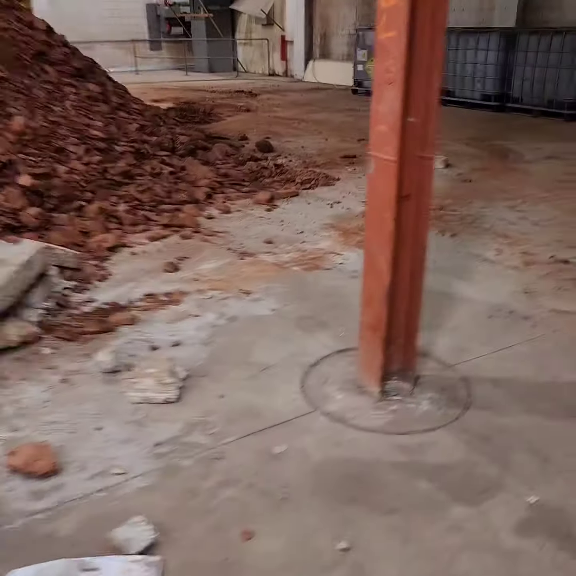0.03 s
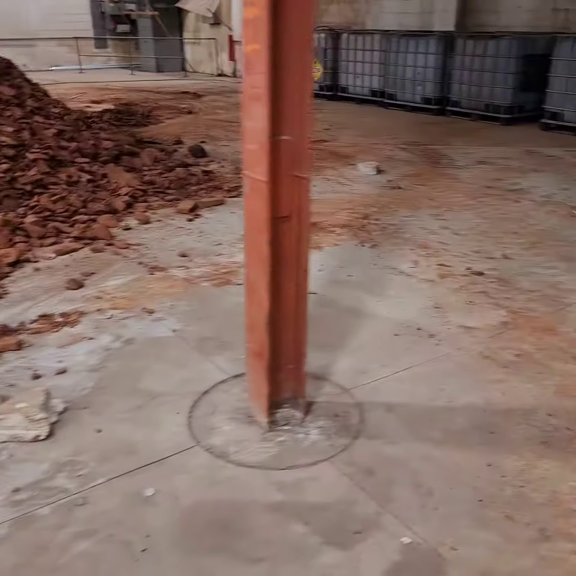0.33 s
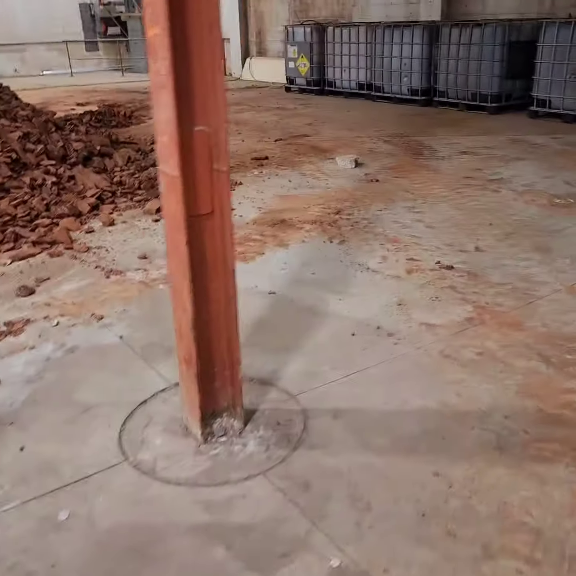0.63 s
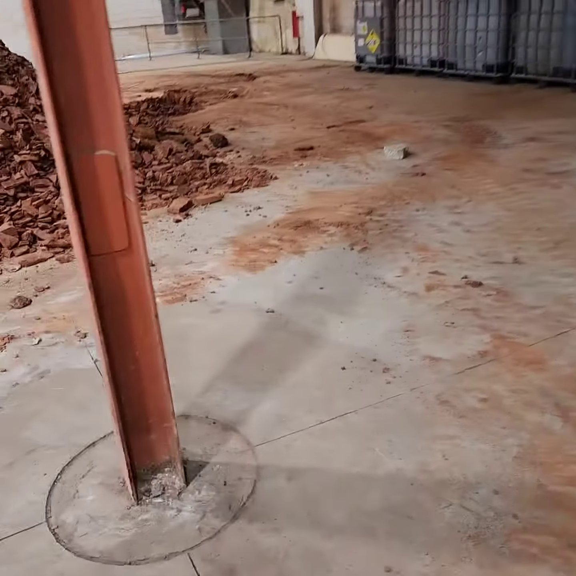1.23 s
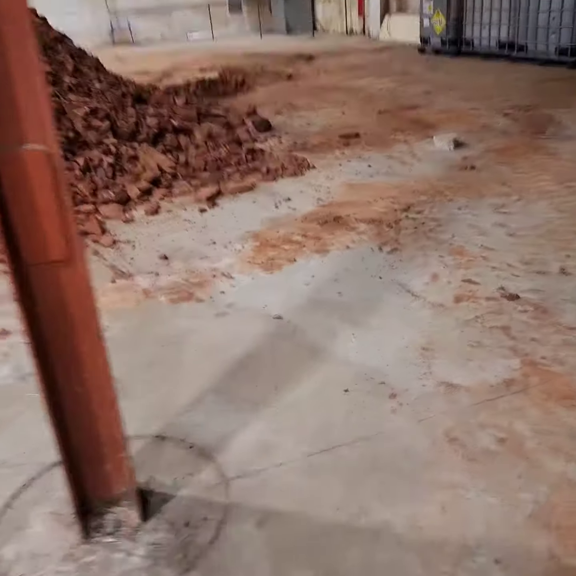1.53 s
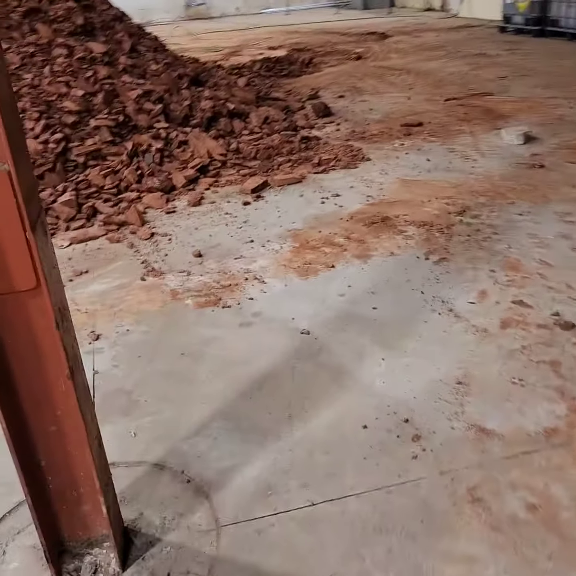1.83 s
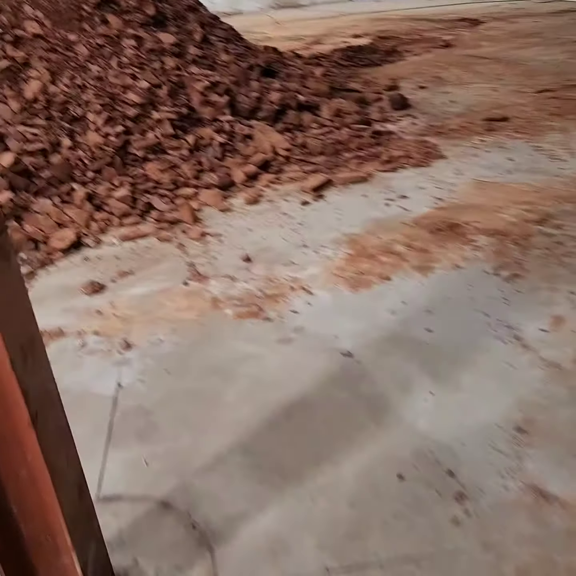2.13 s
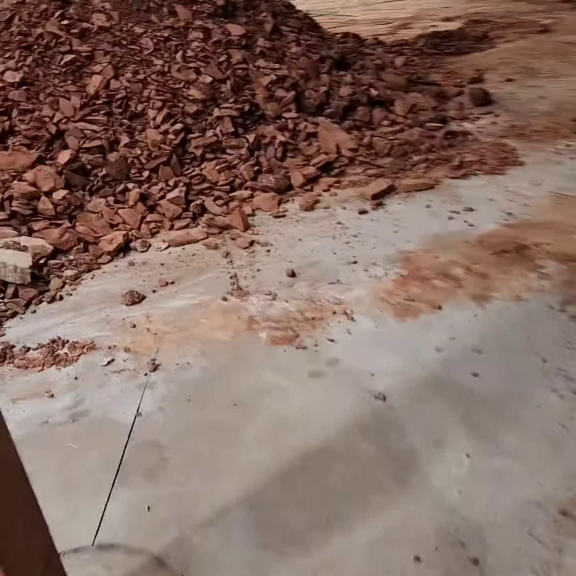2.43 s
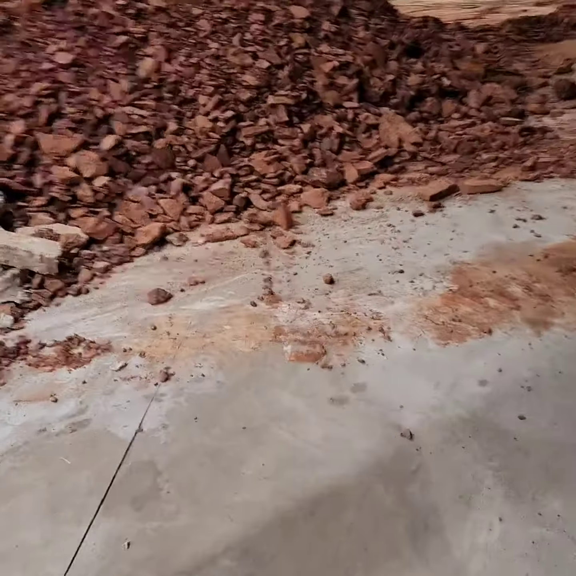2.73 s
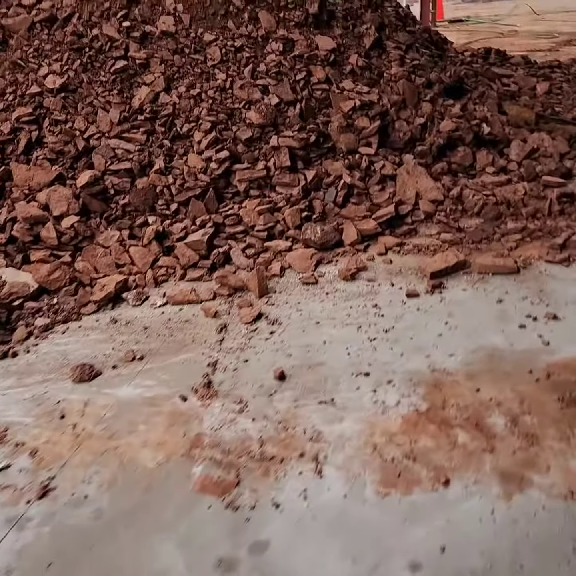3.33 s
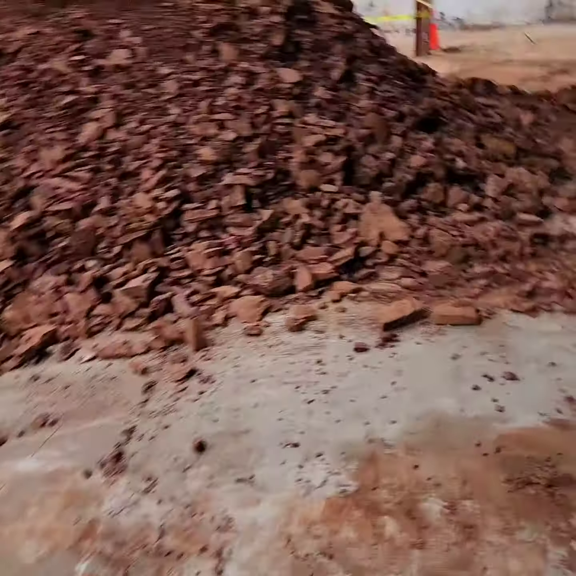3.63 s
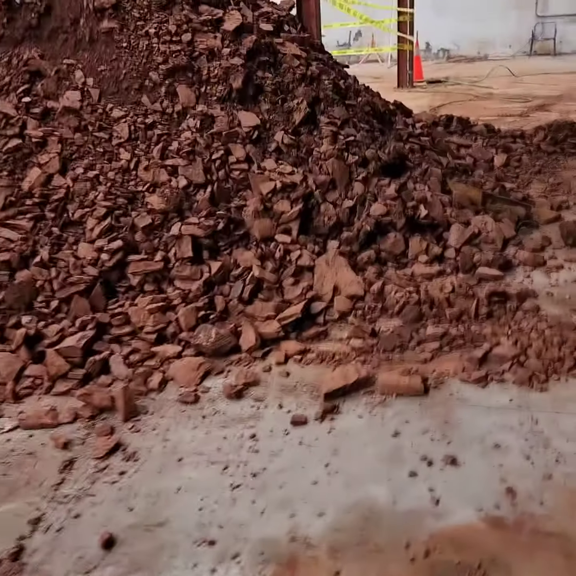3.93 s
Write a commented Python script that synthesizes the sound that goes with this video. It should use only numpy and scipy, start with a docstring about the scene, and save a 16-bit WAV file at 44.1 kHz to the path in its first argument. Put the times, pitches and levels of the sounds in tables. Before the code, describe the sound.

Low rumble and hum of distant machinery, with a few knocks and gritty footsteps.

```python
"""Slow walk in an industrial hall.

Two distant machines hum and beat over a rumble; hiss and thin whines swell midway.
Fingers knock on the hand-held phone that hears it all. One hollow scrape rings through the hall.
Soles crunch, grind and slide on gritty concrete, each sound a stream of tiny fractures."""
import sys
import numpy as np
from scipy import signal
from scipy.fft import rfft, irfft
from scipy.io import wavfile
from scipy.ndimage import uniform_filter1d

SR = 44100
rng = np.random.default_rng(int(sys.argv[2]) if len(sys.argv) > 2 else 0)


def transcribe(signal):
    """Save signal, clipped to [-1, 1], as a 16-bit WAV file at the path in sys.argv[1]."""
    frames = np.atleast_2d(signal).T
    limited = np.clip(frames, -1, 1)
    pcm = np.round(limited * 32767).astype(np.int16)
    wavfile.write(sys.argv[1], SR, pcm)


N = 176400

# Noise spectra. Each row: frequency in Hz, relative density in dB.
RUMBLE_SHAPE = [(20, -31), (35, -9), (52, -1), (80, 1.5), (110, -3), (165, -3), (210, -9), (300, -13),
                (450, -20), (700, -22.5), (1100, -37.5), (2500, -50.5)]
HISS_SHAPE = [(300, -20), (700, -2.5), (1100, -1), (1600, 0.5), (2300, 2.5), (3000, -7.5), (4200, -6),
              (5300, -20.5), (7500, -19), (9500, -44), (16000, -84)]
SHRILL_SHAPE = [(1200, -13.5), (2400, -3.5), (3100, 1), (4100, -2.5), (5200, -10.5), (8000, -38.5),
                (16000, -23)]
SIZZLE_SHAPE = [(3000, 10), (5500, -13.5), (7600, 1.5), (9400, -13), (11800, 2), (13500, -6), (16000, -4)]
RATTLE_SHAPE = [(200, 1), (400, 16.5), (550, 23.5), (800, -17), (1300, -11), (2000, 15.5), (3000, -6),
                (4050, 12.5), (5200, -13), (8300, -7.5), (16000, -18)]
RASP_SHAPE = [(150, -10), (260, 6), (450, 4.5), (800, -5.5), (1200, -7), (2100, -7), (4200, -12.5),
              (7000, -18.5), (16000, -66)]
GRIT_SHAPE = [(300, -17), (1300, -10), (2100, 7.5), (2900, -7.5), (3900, 7.5), (5200, -5.5), (7800, -0.5),
              (9500, -10), (11800, -5), (16000, -14.5)]
DUST_SHAPE = [(1500, -14), (4000, 6.5), (7400, 5.5), (9500, -1.5), (12500, 1), (16000, -1)]
# Background levels along the walk. Each row: time in seconds, level in dB.
RUMBLE_BASS_DB = [(0, -39), (1.45, -39), (1.72, -35.5), (1.95, -40), (2.5, -36.5), (2.85, -42), (3.5, -40),
                  (4, -43)]
HUM_DB = [(0, -31), (.18, -29.5), (.45, -34), (.7, -35), (.9, -30), (1.17, -26), (1.38, -30), (1.8, -28),
          (2.1, -35), (2.5, -34.5), (2.85, -37.5), (3.2, -31), (3.45, -43), (3.7, -34.5), (4, -33)]
HUM_OCTAVE_DB = [(0, -53), (.35, -45.5), (.9, -56), (1.2, -49.5), (1.75, -57), (2.2, -43.5), (2.9, -49),
                 (3.4, -59), (4, -63)]
HISS_DB = [(0, -47.5), (1.2, -46.5), (1.85, -44), (2.1, -46), (2.45, -41.5), (2.75, -46), (3.2, -45.5),
           (3.6, -49), (4, -46.5)]
CASING_DB = [(0, -57), (1.85, -46.5), (2.5, -54), (4, -67)]
SHRILL_RUSH_DB = [(0, -55.5), (1.2, -56.5), (1.5, -52.5), (1.85, -47), (2.55, -48), (2.8, -50.5),
                  (3.4, -50), (4, -57.5)]
SHRILL_WHINE_DB = [(0, -64), (1.15, -67), (1.83, -52.5), (2.05, -56), (2.62, -57.5), (2.84, -68)]
SIZZLE_DB = [(0, -52), (.5, -57.5), (1.15, -50.5), (1.55, -51.5), (1.9, -56), (2.4, -50), (2.75, -56),
             (3.1, -60), (3.72, -55.5), (4, -64)]
# Two beating machine hums. Each row: frequency in Hz, level in dB re HUM_DB.
HUM_TONES = [(117.15, -0.5), (127.0, -6.5)]
# Lesser motor tones. Each row: frequency in Hz, level in dB.
DRONE_TONES = [(93.9, -45.5), (61, -49.5), (58.54, -50.5), (177, -55), (349, -57), (406.4, -60.5),
               (462, -59), (872, -64)]
# Machine whines. Each row: frequency in Hz, level in dB re the hiss.
WHINE_TONES = [(1403, -18), (1540, -17), (1631, -17.5), (2013, -19)]
# Machine casings, hollow object, stones. Each row: frequency in Hz, width in Hz, relative level in dB.
CASING_MODES = [(1536, 170, 0.5), (2356, 52, 1)]
HOLLOW_MODES = [(251, 56, 3), (333, 13, 1.5), (396.4, 17, -2), (591, 30, 0.5), (670, 22, -11),
                (765, 11, -5), (823, 24, -2.5)]
STONE_MODES = [(2050, 520, 0), (2420, 620, -1)]
# Phone case. Each row: frequency in Hz, T60 in seconds, relative gain in dB.
PHONE_MODES = [(203, 0.018, -6), (587, 0.0068, -2.5), (1180, 0.00091, 9.5), (2220, 0.0044, -4)]
# Finger knocks. Each row: start in seconds, peak in dB, brightness in Hz, rattle in dB re the peak.
FINGER_KNOCKS = [(1.3095, -15.5, 2000, -28), (2.4458, -18, 2500, -7), (2.5562, -8, 1200, -29),
                 (3.858, -20, 450, -21)]
# Steps. Each row: start in seconds, crunch in dB, heel in dB re crunch, decay in seconds, chip ring in Hz.
FOOTFALLS = [(.603, -36.5, 4.5, .055, 3690), (1.344, -41, 3.5, .065, 6250), (2.822, -42, -10, .06, 3730),
             (3.612, -47.5, 0, .025, 4200)]
# Stones underfoot. Each row: start in seconds, length in seconds, level in dB.
STONE_GRINDS = [(.606, 0.15, -45), (1.345, 0.085, -47.5), (2.824, 0.031, -39.5)]
# Soles on dust. Each row: start, rise, hold and release in seconds, level in dB.
SOLE_SLIDES = [(0.67, 0.085, 0.066, .25, -54), (1.34, 0.014, 0.055, 0.053, -45.5),
               (2.449, .02, 0.016, 0.061, -52), (2.8, 0.025, 0.035, 0.061, -45),
               (2.887, 0.041, 0.057, .06, -48), (3.143, 0.056, 0.37, 0.15, -54),
               (3.53, 0.11, 0.028, 0.053, -55)]
# Short ticks on dust: tiny chips, and a faint step at 2.132 s. Each row: start in seconds, level in dB.
DUST_TICKS = [(.091, -53), (.469, -52), (.636, -34.5), (2.132, -45), (2.567, -49)]
# Microphone mismatch. Each row: frequency in Hz, left minus right in dB.
MIC_BALANCE = [(100, 0.5), (700, -1), (1200, -3.5), (2100, -3.5), (4000, -7), (5500, 0.5), (7300, -1),
               (9500, -2), (12000, -7.5), (16000, 1.5)]

HALL_T60_S, HALL_TREBLE_T60_S = 2.05, 1
RUMBLE_WIDE_HZ, RUMBLE_BASS_HZ, ROAR_DB = 463, 222, -37
HUMS_IN_PHASE_S, HUM_WANDER_RAD, HUM_WAVER_DB = 1.175, .1, .6
SHRILL_HZ, SHRILL_JITTER_RAD = 2960, .6
THUD_LEFT_DB, RATTLE_DECAY_S = -12.5, .0035
SCRAPE_S, RASP_DB, HOLLOW_DB, JUDDER_DB = 2.751, -37, -38, 2.5
GRAINS_PER_S, GRIT_SPREAD_DB, DUST_SPREAD_DB, CATCH_DB = 7000, 1, 2.5, 2.3
HEEL_DELAY_S, HEEL_DECAY_S, CHIP_WIDTH_HZ, CHIP_DB, STEP_HALL_DB = .001, .0045, 450, 4, -6.5
LOWPASS_HZ = 15850


def undb(db):
    """Decibels to gain."""
    return 10 ** (np.asarray(db) / 20)


def times():
    """Sample times in seconds."""
    return np.arange(N) / SR


def unit(x):
    """Scale to rms 1."""
    return x / np.sqrt(np.mean(x ** 2) + 1e-20)


def curve(rows):
    """Join (seconds, value) rows by straight lines."""
    return np.interp(times(), *np.array(rows).T)


def drift(rate_hz):
    """Smooth random signal, spread near 1."""
    span = max(int(SR / rate_hz), 2)
    stairs = np.repeat(rng.standard_normal(2048), span)[:N]
    return 1.51 * uniform_filter1d(uniform_filter1d(stairs, span), span)


def fall(start_s, decay_s):
    """Sudden onset, exponential decay."""
    age_s = times() - start_s
    return np.clip(age_s / 0.00027, 0, 1) * np.exp(-np.maximum(age_s, 0) / decay_s)


def swell(start_s, rise_s, hold_s, release_s):
    """Trapezoid envelope."""
    return np.interp(times(), start_s + np.cumsum([0, rise_s, hold_s, release_s]), [0, 1, 1, 0])


def colour(x, shape):
    """Minimum-phase filter of (Hz, dB) shape, unit power gain."""
    hz, db = np.array(shape, float).T
    bins_hz = np.fft.rfftfreq(8192, 1 / SR)
    cepstrum = irfft(np.log(undb(np.interp(np.log(bins_hz + 1), np.log(hz), db))))
    half = len(cepstrum) // 2
    cepstrum[1:half] *= 2
    cepstrum[half + 1:] = 0
    impulse = irfft(np.exp(rfft(cepstrum)))
    return signal.fftconvolve(x, impulse[None] / np.linalg.norm(impulse), axes=-1)[:, :N]


def ring(x, hz, t60_s):
    """One decaying mode."""
    return signal.lfilter([1], [1, -np.exp((2j * np.pi * hz - np.log(1000) / t60_s) / SR)], x).imag


def resonate(x, modes):
    """Parallel (Hz, width Hz, dB) modes; keeps the level."""
    out = sum(undb(db) * unit(ring(x, hz, np.log(1000) / (np.pi * width))) for hz, width, db in modes)
    return unit(out) * x.std()


def place(three, shared, pan_db):
    """Stereo from one common and two separate signals; positive pan is left."""
    pair = np.sqrt(shared) * three[0] + np.sqrt(1 - shared) * three[1:]
    return pair * undb(np.array([[pan_db], [-pan_db]]) / 2)


def grains(spread_db):
    """Three streams of tiny fractures of uneven size."""
    size = undb(spread_db * np.minimum(rng.exponential(size=(3, N)), 5))
    return unit((rng.random((3, N)) < GRAINS_PER_S / SR) * size * rng.standard_normal((3, N)))


def air():
    """Diffuse white noise, slightly left."""
    return place(rng.standard_normal((3, N)), shared=0.037, pan_db=2.0)


def hall(x):
    """Diffuse tail; treble dies first."""
    noise, t = rng.standard_normal((2, N)), times()
    low = signal.sosfilt(signal.butter(2, 3000, fs=SR, output="sos"), noise)
    tail = low * 1000 ** (-t / HALL_T60_S) + (noise - low) * 1000 ** (-t / HALL_TREBLE_T60_S)
    tail *= np.clip(t / 0.0097, 0, 1)
    return signal.fftconvolve(x, tail / np.linalg.norm(tail[0]), axes=-1)[:, :N]


def rumble():
    """Hall noise: swelling, near-mono bass under a wider, steadier roar."""
    mid, side = colour(rng.standard_normal((2, N)), RUMBLE_SHAPE)
    side = signal.sosfilt(signal.butter(1, RUMBLE_WIDE_HZ, "high", fs=SR, output="sos"), side) * 0.67
    noise = mid + side * np.array([[1], [-1]])
    bass = signal.sosfiltfilt(signal.butter(2, RUMBLE_BASS_HZ, fs=SR, output="sos"), noise)
    return (undb(curve(RUMBLE_BASS_DB)) * bass + undb(ROAR_DB) * (noise - bass)) * undb(drift(11))


def machine_hum():
    """Two close tones beat; lesser motor tones and the first hum's octave waver with them."""
    phase_per_hz = 2 * np.pi * (times() - HUMS_IN_PHASE_S)
    hum = 0
    for hz, db in HUM_TONES:
        gain = undb(db + curve(HUM_DB) + HUM_WAVER_DB * drift(10))
        hum += gain * np.cos(hz * phase_per_hz + HUM_WANDER_RAD * drift(17))
    for hz, db in DRONE_TONES:
        hum += undb(db + 2 * drift(3.6)) * np.cos(hz * phase_per_hz + 1.37 * drift(3))
    octave_hz = 2 * HUM_TONES[0][0]
    hum += undb(curve(HUM_OCTAVE_DB)) * np.cos(octave_hz * phase_per_hz + .5 * drift(2.87))
    return np.sqrt(2) * hum


def whine(hz, scatter):
    """Three versions of a steady tone plus its scatter from the hall."""
    carrier = np.exp(2j * np.pi * hz * times())
    versions = []
    for _ in range(3):
        direct = np.exp(2j * np.pi * rng.random())
        scattered = scatter * (drift(22.3) + 1j * drift(22.09))
        versions.append(((direct + scattered) * carrier).real)
    return unit(np.array(versions))


def shrill_machine():
    """A rush and a phase-jittered whine, loudest midway."""
    phase = 2 * np.pi * SHRILL_HZ * times()
    tone = unit(np.array([np.cos(phase + SHRILL_JITTER_RAD * drift(70)) for _ in range(2)]))
    rush = colour(air(), SHRILL_SHAPE)
    return rush * undb(curve(SHRILL_RUSH_DB)) + tone * undb(curve(SHRILL_WHINE_DB))


def machine_hiss():
    """Machine treble: whines, ringing casings, the shrill machine, faint sizzle and rushing noise."""
    whines = sum(undb(db) * whine(hz, scatter=1.1) for hz, db in WHINE_TONES)
    whines = place(whines, shared=0.5, pan_db=-2)
    casings = resonate(air(), CASING_MODES) * undb(curve(CASING_DB))
    shrill = shrill_machine()
    sizzle = colour(air(), SIZZLE_SHAPE) * undb(curve(SIZZLE_DB) + 0.28 * drift(12.3))
    hiss = (colour(air(), HISS_SHAPE) + whines) * undb(curve(HISS_DB) + 0.41 * drift(13))
    return hiss + casings + shrill + sizzle


def finger_knocks():
    """Short pushes ring and rattle the phone case near the right microphone."""
    thuds, shake = 0, 0
    for start_s, peak_db, hz, rattle_db in FINGER_KNOCKS:
        age_rad = np.maximum(times() - start_s, 0) * 2 * np.pi * hz
        push = age_rad * np.exp(-age_rad)
        thud = sum(undb(db) * ring(push, mode_hz, t60_s) for mode_hz, t60_s, db in PHONE_MODES)
        thud = signal.sosfilt(signal.butter(1, 220, "high", fs=SR, output="sos"), thud)
        thuds -= undb(peak_db) * thud / np.abs(thud).max()
        shake += undb(peak_db + rattle_db) * fall(start_s - .0005, RATTLE_DECAY_S)
    rattle = colour(place(grains(0.37), shared=0.75, pan_db=-9.0) * shake, RATTLE_SHAPE)
    return thuds * undb([[THUD_LEFT_DB], [0]]) + rattle


def hollow_scrape():
    """A hollow object is dragged: a juddering rasp, then resonances that linger in the hall."""
    friction = place(grains(1.6), shared=0.22, pan_db=2.3) * swell(SCRAPE_S, 0.15, 0.035, 0.3)
    rasp = colour(friction * undb(JUDDER_DB * drift(85)), RASP_SHAPE)
    body = resonate(place(grains(3.0), shared=0.97, pan_db=1.5), HOLLOW_MODES)
    body *= swell(SCRAPE_S + 0.12, 0.086, 0.049, 0.29)
    direct = undb(RASP_DB) * rasp + undb(HOLLOW_DB) * body
    return direct + undb(-3.5) * hall(direct)


def grit_crunch(catch):
    """Grit cracks under each step; the heel clicks and rings a chip."""
    grit = place(grains(GRIT_SPREAD_DB), shared=0.028, pan_db=0.0)
    crunch = 0
    for start_s, db, heel_db, decay_s, chip_hz in FOOTFALLS:
        heel = undb(heel_db) * fall(start_s + HEEL_DELAY_S, HEEL_DECAY_S)
        cracks = grit * undb(db) * (fall(start_s, decay_s) * catch + heel)
        chip = resonate(grit * undb(db) * heel, [(chip_hz, CHIP_WIDTH_HZ, 0)])
        crunch += colour(cracks, GRIT_SHAPE) + undb(CHIP_DB) * chip
    return crunch


def stone_grind():
    """Stones grind and ring underfoot."""
    envelope = sum(undb(db) * swell(start_s, 0.006, length_s / 2, length_s / 2)
                   for start_s, length_s, db in STONE_GRINDS)
    friction = place(grains(0.73), shared=0.56, pan_db=0.5)
    return resonate(resonate(friction, STONE_MODES), STONE_MODES) * envelope


def dust_slide(catch):
    """Soles slide on dust; tiny chips and a faint step tick."""
    slides = sum(undb(db) * swell(*timing_s) for *timing_s, db in SOLE_SLIDES)
    ticks = sum(undb(db) * fall(start_s, 0.0047) for start_s, db in DUST_TICKS)
    dust = place(grains(DUST_SPREAD_DB), shared=0.041, pan_db=0.5)
    return colour(dust * (slides + ticks) * catch, DUST_SHAPE)


def footsteps():
    """Crunch and grind excite the hall; the dust stays dry."""
    catch = undb(CATCH_DB * drift(140))  # grit catches and lets go
    steps = grit_crunch(catch) + stone_grind()
    return steps + dust_slide(catch) + undb(STEP_HALL_DB) * hall(steps.mean(axis=0, keepdims=True))


def scene():
    """Stereo sum of all sources."""
    return machine_hum() + rumble() + machine_hiss() + footsteps() + hollow_scrape() + finger_knocks()


def record(dry):
    """The two microphones differ in colour; the phone cuts the top."""
    hz, db = np.array(MIC_BALANCE, float).T
    balance_db = np.interp(np.log(np.fft.rfftfreq(N, 1 / SR) + 1), np.log(hz), db)
    heard = irfft(rfft(dry) * undb(np.array([balance_db, -balance_db]) / 2), N)
    return signal.sosfilt(signal.ellip(10, .2, 80, LOWPASS_HZ, fs=SR, output="sos"), heard)


dry = scene()
out = record(dry)
transcribe(out)
```